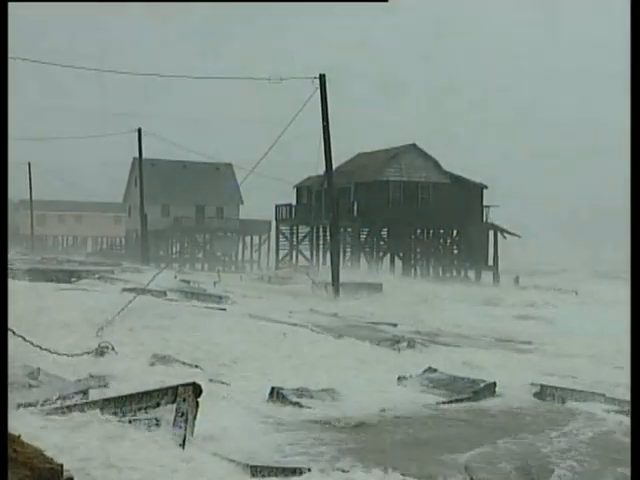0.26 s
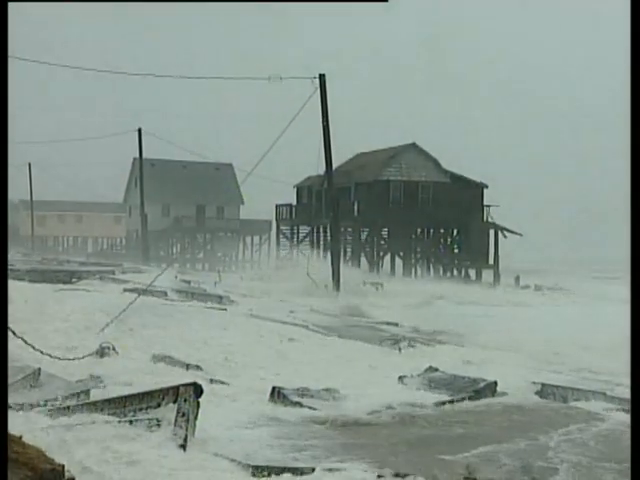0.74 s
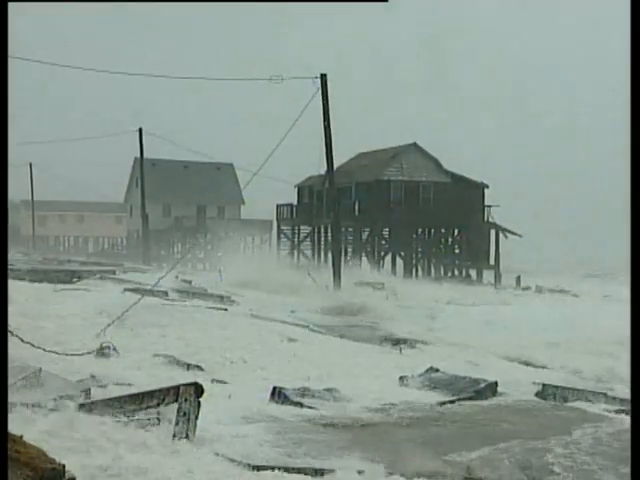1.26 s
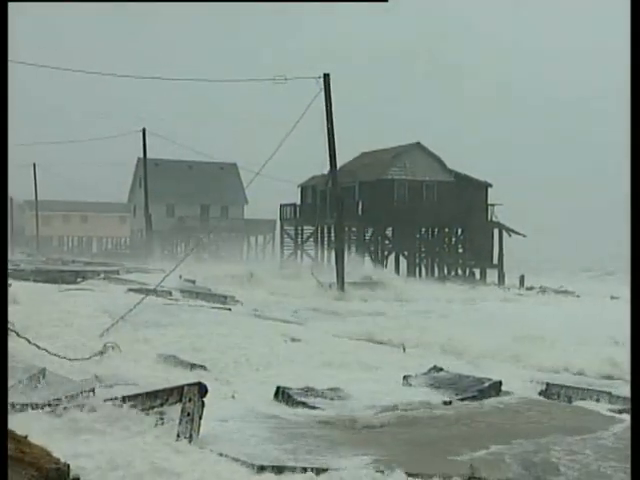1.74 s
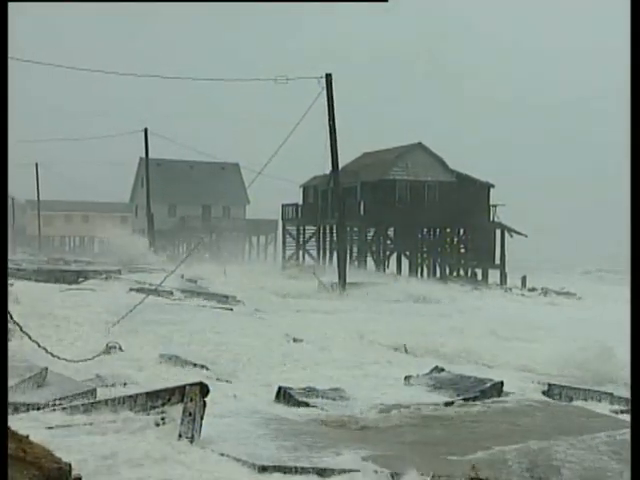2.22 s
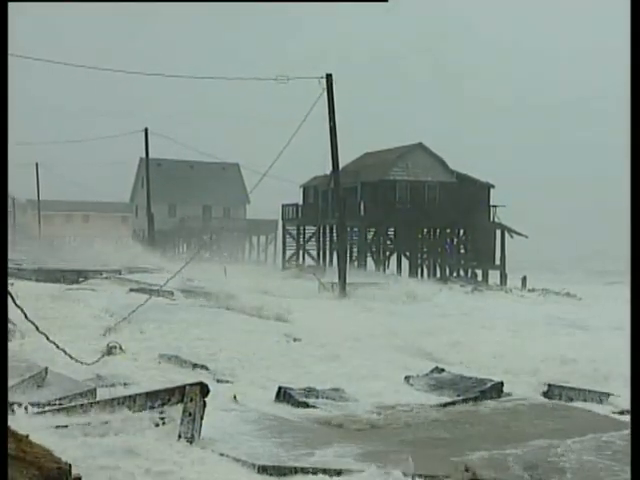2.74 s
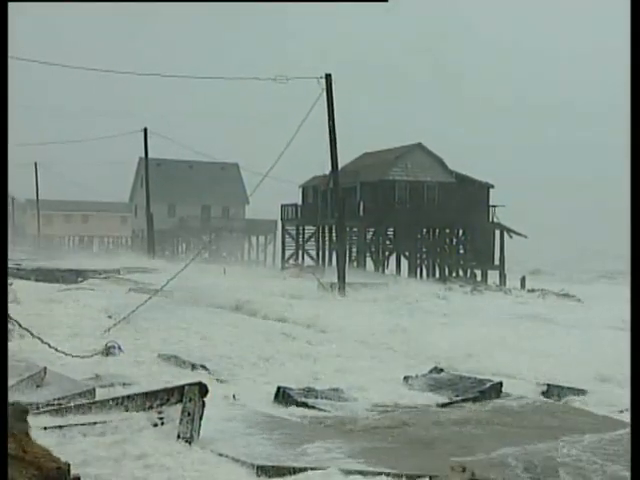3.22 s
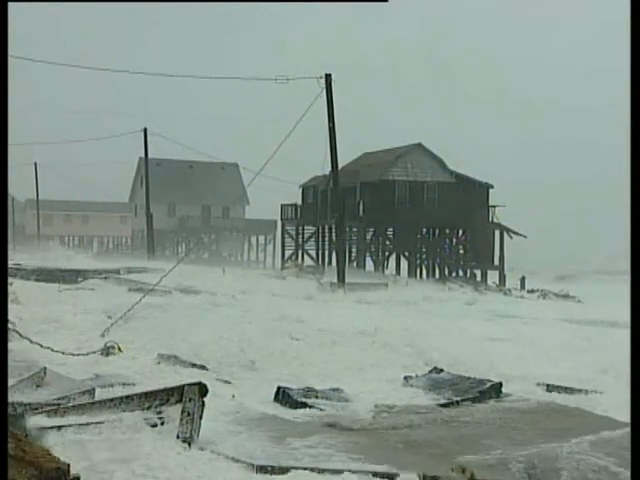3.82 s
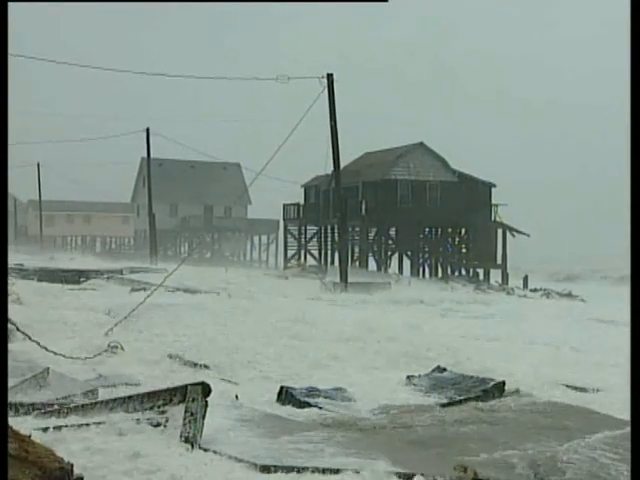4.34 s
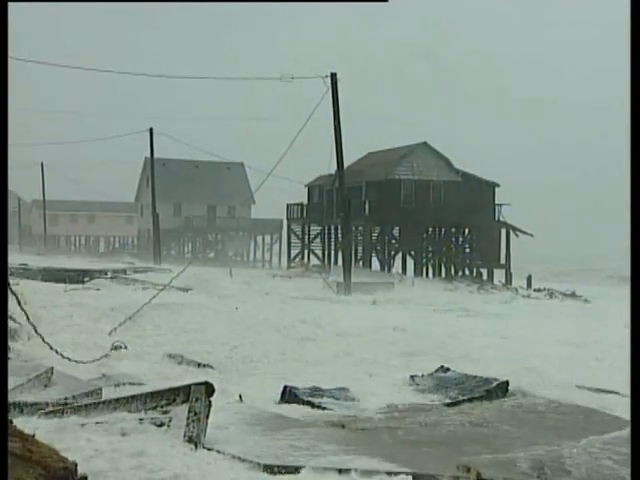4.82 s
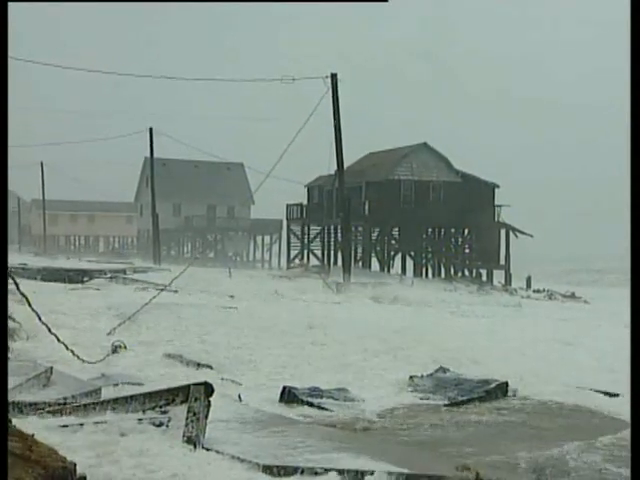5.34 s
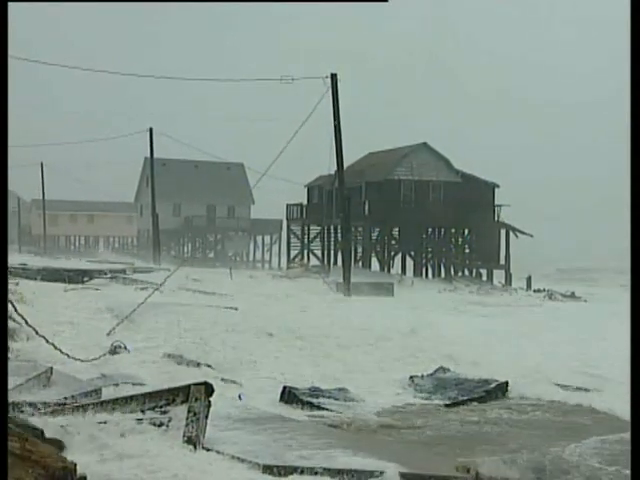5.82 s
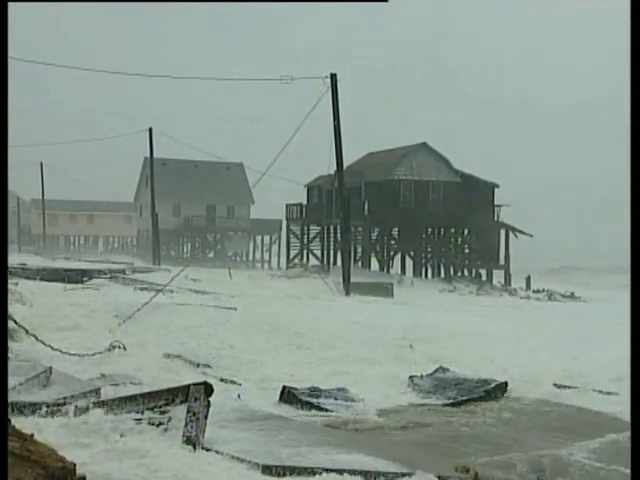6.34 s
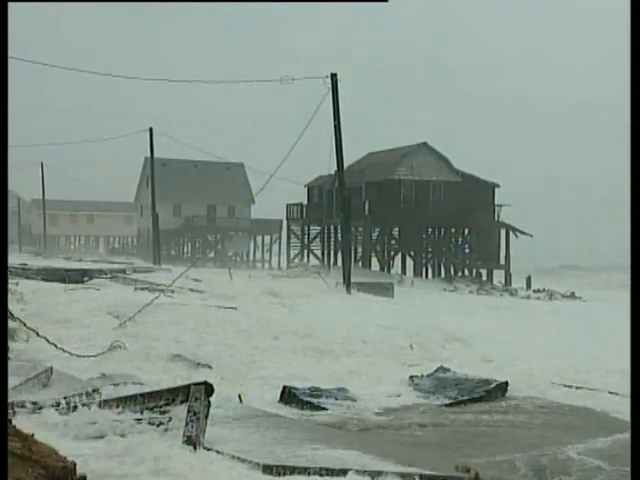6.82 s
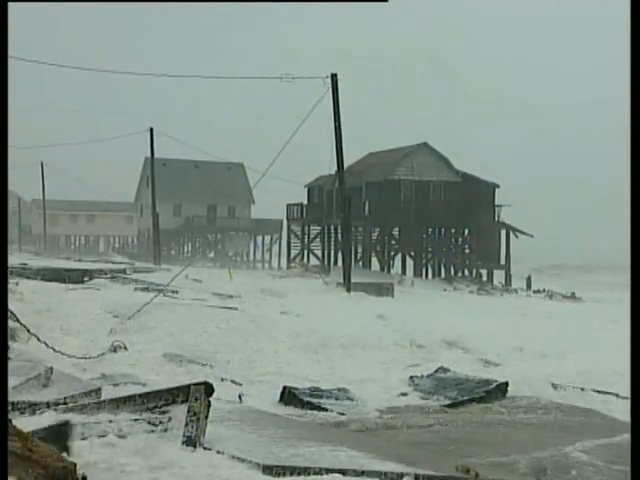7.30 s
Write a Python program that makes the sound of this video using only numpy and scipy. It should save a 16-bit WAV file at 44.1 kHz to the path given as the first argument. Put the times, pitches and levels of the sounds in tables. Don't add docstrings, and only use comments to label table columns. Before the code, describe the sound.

A storm-driven sea washes around stilt houses while fierce wind strikes a bare microphone at point-blank range, badly overloading it. From 0 s a dense, gritty roar crackles and flutters, with irregular low thumps and momentary choking. Around 1 s strong bursts follow tiny gaps; from 1.5 to 2.3 s the chatter is more continuous and bright with surf and spray. Near 2.45 s a gust nearly silences it, then it snaps back, hissing until about 3.2 s. From 3.6 to 5 s the tone is darker and more broken, with pops, sputters and short surges. Spray brightens again around 5.4 s; the heaviest choking and lurching bursts come at 5.6-6.1 s. Uneven roar and dropouts continue to 7.5 s without resolving. Drops and sand tick throughout. Sound is hard left, dry and close; the right holds almost inaudible hiss, thin whine and faint treble leakage.

```python
import sys
import numpy as np
from scipy import signal
from scipy.fft import rfft, irfft
from scipy.io import wavfile
from scipy.ndimage import uniform_filter1d

SR = 44100
rng = np.random.default_rng(int(sys.argv[2]) if len(sys.argv) > 2 else 0)


def voltage_ratio(level):
    return 10 ** (np.asarray(level, float) / 20)


def bounce(signal):
    frames = np.transpose(np.atleast_2d(signal))
    limited = np.clip(frames, -1, 1)
    pcm = np.round(limited * 32767).astype(np.int16)
    wavfile.write(sys.argv[1], SR, pcm)


N = 333837

# centre_s, half_length_ms, push
GUST_SWELLS = [(0, 100, 0.72), (.235, 73, 0.89), (.44, 83, 0.59), (.56, 150, 0.74), (.79, 68, 1.1),
               (.995, 52, 0.96), (1.21, 150, 0.98), (1.62, 520, 0.33), (1.9, 31, 0.13), (2.02, 110, 0.47),
               (2.22, 104, 0.35), (2.45, 78, 2), (2.66, 370, 0.39), (2.85, 41, 1.1), (3.0, 48, 0.98),
               (3.26, 85, 0.43), (3.76, 440, 0.56), (4.15, 91, 0.45), (4.39, 88, 0.98), (4.56, 160, 1.13),
               (4.91, 180, 0.57), (5.3, 237, 0.73), (5.64, 98, 1.43), (5.885, 64, 1.9), (6.33, 210, 0.74),
               (6.675, 66, 1.04), (6.94, 146, 0.63), (7.125, 90, 1.23)]
# centre_s, half_length_ms, push
BUFFET_SWELLS = [(.28, 7.5, 1), (.446, 11.4, 14), (.826, 17, 2.1), (.976, 5.7, -0.5), (1.05, 16, -0.4),
                 (1.114, 14, -1.7), (1.288, 11, 1.2), (1.482, 9.6, 1.5), (1.552, 14, 3), (2.029, 5.7, 4),
                 (2.061, 34, 2.2), (2.13, 8, 2.5), (2.225, 5.6, 1.8), (2.48, 14, -1.5), (2.732, 7.5, 4.5),
                 (3.077, 45, -0.5), (3.832, 5.6, 4), (4.117, 7.9, 2.4), (4.234, 28, 2.5), (4.357, 9.4, 0.5),
                 (4.41, 32, -0.2), (4.454, 10.4, -1), (4.703, 11.7, 4), (5.212, 6.4, 1.2), (5.76, 18, -11),
                 (5.796, 2.3, 11), (6.05, 7, -1.5), (6.498, 20, 2.5), (6.735, 10.4, 4.5), (7.362, 13, 2.5)]
# start_s, length_ms, push
PIN_SHOVES = [(0.343, 6.8, 7), (1.005, 26, 8), (1.15, 7.6, 10), (1.361, 12, -2), (1.967, 7.3, 4),
              (2.419, 30, 4), (2.45, 18, 9), (2.646, 12.6, -0.5), (2.831, 4, 3.5), (2.863, 7.3, 6),
              (3.221, 6.4, 7), (3.246, 5.3, 3.5), (4.045, 12.3, 3.5), (4.195, 6.3, 1), (4.281, 18, -5),
              (4.912, 7.1, 12), (4.917, 6.4, 3), (5.17, 7.7, 9.5), (5.39, 9.7, 4), (5.57, 11.5, 10),
              (5.657, 13.1, 5), (5.817, 11, -3), (5.866, 49, 15), (5.917, 6.1, 7), (6.243, 7.6, 3.5),
              (6.263, 12, 1.5), (6.432, 7.9, 3), (7.148, 5.8, 5), (7.167, 15.8, 5), (7.269, 13, 3)]
# freq_hz, density_db_per_hz
RUMBLE_SPECTRUM = [(20, 0.5), (60, 0.5), (200, -5), (600, -11), (1500, -20.5), (4000, -35.5), (21000, -52)]
# freq_hz, density_db_per_hz
SURF_SPECTRUM = [(100, -52), (600, -6.5), (2000, -2.5), (5000, -3.5), (10000, -7.5), (16000, -6.5),
                 (21000, -12.5)]
# time_s, spray_db
SPRAY_LEVEL = [(0, -2.5), (.85, 2.5), (1.25, 0.5), (1.7, 3), (2.1, 3.5), (2.5, -0.1), (2.9, 4), (3.2, 0),
               (3.6, -3), (4.3, -5.5), (4.6, -6.5), (5, -2.5), (5.4, 4.5), (5.7, 3), (6, -2.5), (6.5, -3.5),
               (7, 0.5), (7.57, 3.5)]
# time_s, rail_height_db
RAIL_HEIGHT = [(0, -12.5), (.7, -12.5), (1.0, -14), (1.4, -14), (1.7, -11), (1.93, -13.5), (2.44, -15),
               (2.7, -13.5), (3.2, -17.5), (3.7, -15), (4.33, -22), (4.55, -14), (4.88, -19), (5.3, -15.5),
               (5.83, -18), (6.24, -21), (6.6, -18), (7.57, -14)]
# top_s, rise_db, sinking_ms
GAIN_SURGES = [(.25, 1, 52), (.52, 1, 150), (.85, 5, 65), (1.041, 6, 91), (1.218, 6, 170), (2.05, 1, 38),
               (2.25, 0.5, 160), (2.479, 4.5, 85), (2.9, 5.5, 133), (3.03, 5.5, 60), (3.26, 4.5, 150),
               (3.51, 2.5, 140), (3.83, 3.5, 250), (4.139, 6.5, 77), (4.27, 6, 60), (4.447, 8.5, 48),
               (4.66, 4, 180), (4.94, 5.5, 370), (5.4, 1.5, 300), (5.6, 2.5, 70), (5.701, 9.5, 78),
               (5.79, -3.5, 62), (5.942, 9.5, 112), (6.07, 8.5, 160), (6.285, 4.5, 83), (6.37, 8, 100),
               (6.46, 6.5, 430), (6.71, 2, 153), (6.97, 3, 190), (7.188, 2.5, 51)]
# freq_hz, gain_db
CHAIN_RESPONSE = [(100, 1.13), (1000, 1.5), (4000, -1.43), (10000, -1.8), (15000, -4.5), (15750, -6),
                  (15950, -45), (20000, -42)]
# freq_hz, density_db_per_hz
HISS_SPECTRUM = [(50, -18), (2000, -30), (7300, 10), (7700, 13), (9000, 23), (9500, 16), (11000, 18),
                 (11400, 0), (12900, 4), (13200, -28)]

REST_PUSH = -0.73
RUN_UP_MS, RUN_UP_PUSH = 13.8, 2.2
RECOIL_MS, RECOIL_PUSH = 8.9, 0.38
SHOVE_SCALE = 1.9
FLUTTER_HZ, FLUTTER_PUSH = 11.2, 0.27
SURGE_RISE_MS = 43


def pressure(buffet_scale=1.14, lean_scale=1.72, let_go=0.85, max_push=2.03):
    buffets = list(BUFFET_SWELLS)
    for start_s, length_ms, push in PIN_SHOVES:
        direction = np.sign(push)
        recoil_s = start_s + (length_ms + RECOIL_MS) / 1000
        buffets.append((start_s, RUN_UP_MS, RUN_UP_PUSH * direction))
        buffets.append((recoil_s, RECOIL_MS, -RECOIL_PUSH * direction))
    lean = lean_scale * (REST_PUSH + swells(GUST_SWELLS, 0.97))
    buffeting = buffet_scale * swells(buffets, let_go)
    flutter = FLUTTER_PUSH * drift(FLUTTER_HZ)
    out = max_push * np.tanh((lean + buffeting + flutter) / max_push)
    for start_s, length_ms, push in PIN_SHOVES:
        end_s = start_s + length_ms / 1000
        out[int(start_s * SR):int(end_s * SR)] = SHOVE_SCALE * push
    return out


def swells(rows, let_go):
    out, time_s = np.zeros(N), np.arange(N) / SR
    for centre_s, half_ms, push in rows:
        near = slice(max(int((centre_s - 0.5) * SR), 0), int((centre_s + 0.5) * SR))
        lengths = (time_s[near] - centre_s) * 1000 / half_ms - 0.8 * (1 - let_go)
        side_width = np.where(lengths > 0, let_go, 2 - let_go)
        out[near] += push * np.exp(-2 * (lengths / side_width) ** 2)
    return out


def drift(rate_hz):
    pole = np.exp(-2 * np.pi * rate_hz / SR)
    noise = rng.standard_normal(N + SR)
    return rms_one(signal.lfilter([1], [1, -2 * pole, pole * pole], noise)[SR:])


def roar(gust_db=3.0, gust_hz=25, spray_db=-5):
    rumble = rms_one(shaped(rng.standard_normal(N), RUMBLE_SPECTRUM))
    spray = rms_one(shaped(rng.standard_normal(N), SURF_SPECTRUM))
    strength_db = in_time(SPRAY_LEVEL) + spray_db + gust_db * drift(gust_hz)
    return 0.68 * rumble + spray * voltage_ratio(strength_db)


def drops(rate_per_s=1200, spread_db=6, fade_hz=2500, level_db=-4.5):
    sizes = voltage_ratio(spread_db * np.minimum(rng.exponential(1, N), 3))
    sizes = sizes * rng.choice([-1, 1], N)
    kicks = sizes * (rng.random(N) < rate_per_s / SR)
    pole = np.exp(-2 * np.pi * fade_hz / SR)
    return voltage_ratio(level_db) * rms_one(signal.lfilter([1], [1, -pole], kicks))


def shaped(x, points):
    freq_hz = np.maximum(np.arange(N // 2 + 1) * SR / N, 1)
    points_hz, points_db = np.transpose(points)
    gain_db = np.interp(np.log(freq_hz), np.log(points_hz), points_db)
    return irfft(rfft(x) * voltage_ratio(gain_db), N)


def rms_one(x):
    return x / np.sqrt(np.mean(x ** 2))


def in_time(rows):
    time_s, value = np.transpose(rows)
    return np.interp(np.arange(N) / SR, time_s, value)


def overload(x, drive_db=5, seep_db=-20):
    return np.clip(voltage_ratio(drive_db) * x, -1, 1) + voltage_ratio(seep_db) * np.minimum(x, 0)


def smear(x, fuzz_db=-17, tilt_db=-9, floor_db=-52):
    power = np.diff(x, prepend=x[0]) ** 2
    power = uniform_filter1d(power, size=500, origin=200)
    chatter = np.sqrt(np.abs(uniform_filter1d(power, size=500)))
    veil = rms_one(shaped(rng.standard_normal(N), [(300, -31), (1000, 0.0), (16000, tilt_db)]))
    return x + (voltage_ratio(fuzz_db) * chatter + voltage_ratio(floor_db)) * veil


def rail_db():
    time_ms = np.arange(N) * 1000 / SR
    out = in_time(RAIL_HEIGHT)
    for top_s, rise_db, sinking_ms in GAIN_SURGES:
        out += np.interp(time_ms - top_s * 1000, [-SURGE_RISE_MS, 0, sinking_ms], [0, rise_db, 0])
    return out


def pumping(x, hold_hz=6, depth=0.035, floor_db=-12):
    chatter = rms_one(np.diff(x, prepend=x[0])) ** 2
    pole = np.exp(-2 * np.pi * hold_hz / SR)
    recent = signal.lfilter([1 - pole], [1, -pole], chatter - 1) + 1
    return (recent + voltage_ratio(floor_db)) ** -depth


def coupling(x, ring_hz=12, damping=0.49, block_hz=7):
    w = 2 * np.pi * ring_hz
    x = signal.lfilter(*signal.bilinear([1, 0, 0], [1, 2 * damping * w, w * w], SR), x)
    return signal.lfilter(*signal.butter(1, block_hz, "high", fs=SR), x)


def dead_input(hiss_db=-91.0, whine_hz=8571.4, whine_db=-92):
    hiss = rms_one(shaped(rng.standard_normal(N), HISS_SPECTRUM))
    whine = np.sin(2 * np.pi * whine_hz * np.arange(N) / SR)
    return voltage_ratio(hiss_db) * hiss + voltage_ratio(whine_db) * whine


def crosstalk(x, leak_db=-69, leak_hz=2500):
    band = signal.butter(2, [leak_hz, 12800], "band", fs=SR, output="sos")
    return voltage_ratio(leak_db) * signal.sosfilt(band, x)


def scene():
    noise = roar() + drops()
    dead = dead_input()
    return np.array([pressure() + noise, dead])


def band_limit(x):
    return signal.sosfilt(signal.butter(12, 16690, fs=SR, output="sos"), x)


def record(dry, trim_db=-5):
    railed = overload(dry[0])
    gain = voltage_ratio(rail_db() + trim_db) * pumping(railed)
    centred = smear(railed) - railed[:2000].mean()
    left = coupling(shaped(centred, CHAIN_RESPONSE) * gain)
    right = dry[1] + crosstalk(left)
    return band_limit(np.array([left, right]))


dry = scene()
out = record(dry)
bounce(out)
```